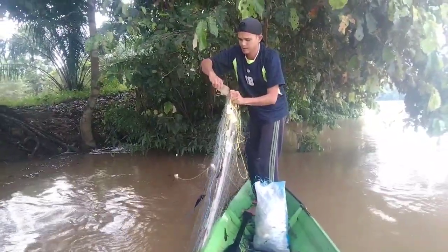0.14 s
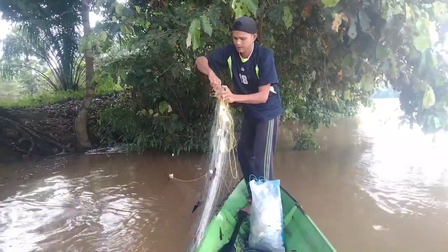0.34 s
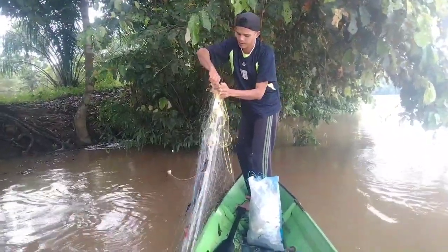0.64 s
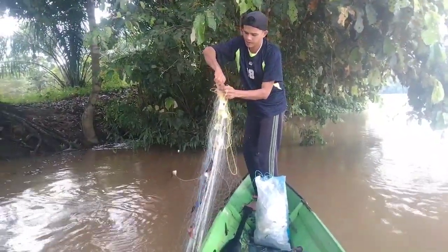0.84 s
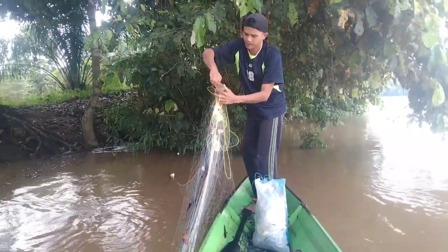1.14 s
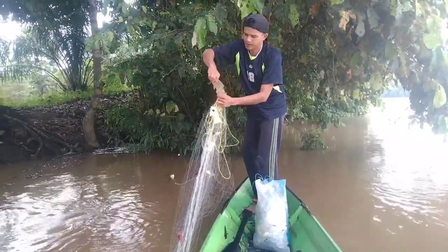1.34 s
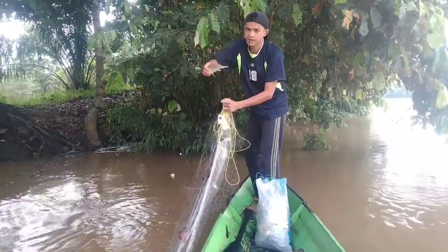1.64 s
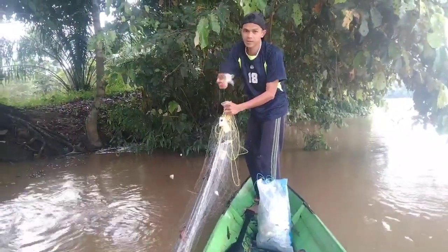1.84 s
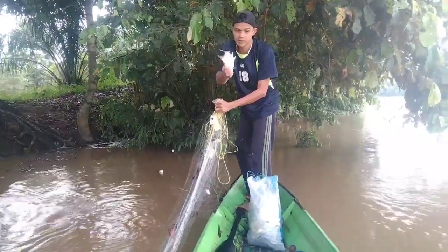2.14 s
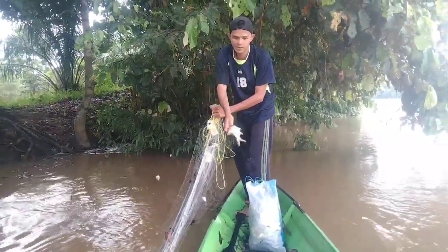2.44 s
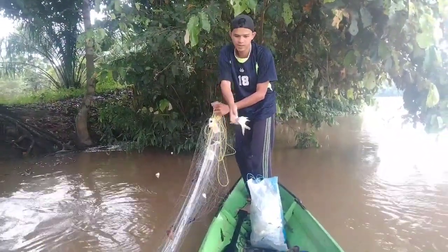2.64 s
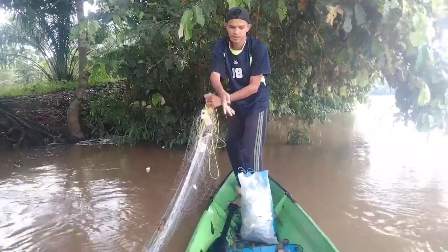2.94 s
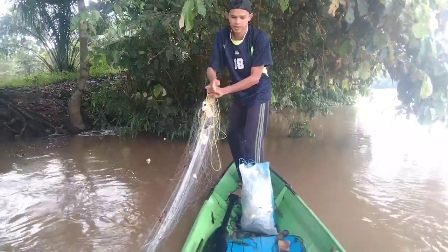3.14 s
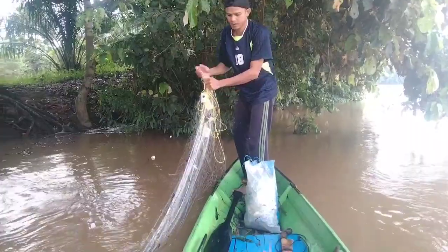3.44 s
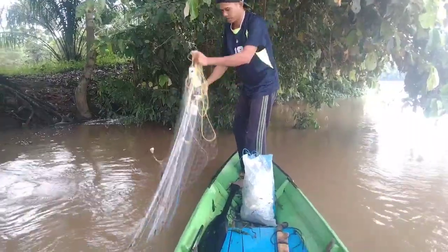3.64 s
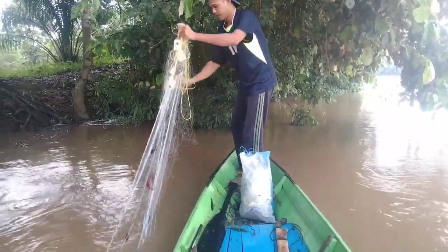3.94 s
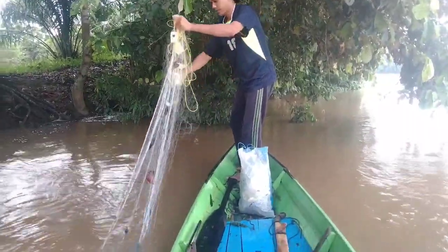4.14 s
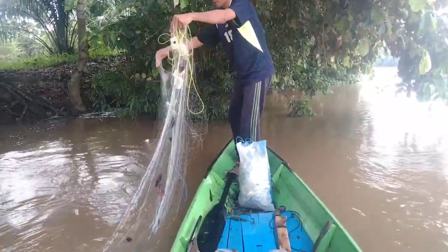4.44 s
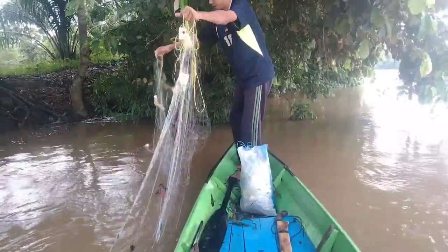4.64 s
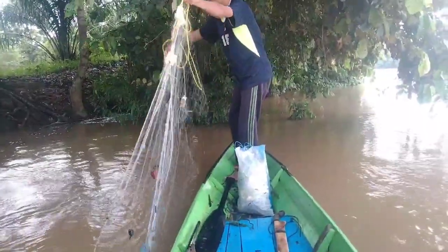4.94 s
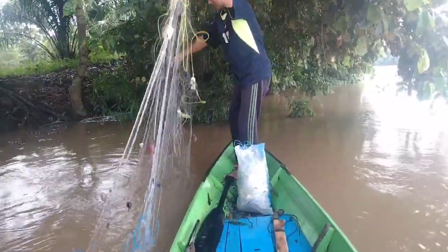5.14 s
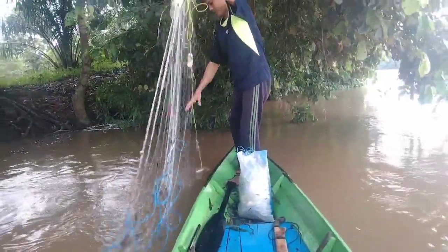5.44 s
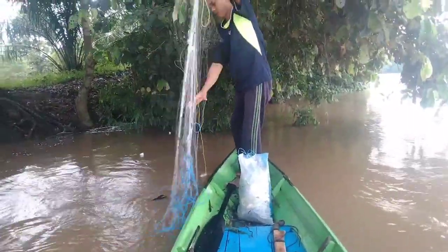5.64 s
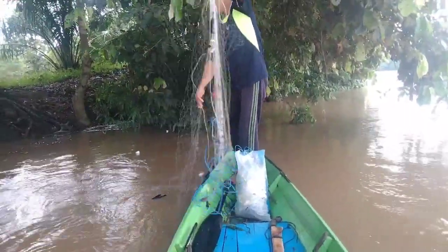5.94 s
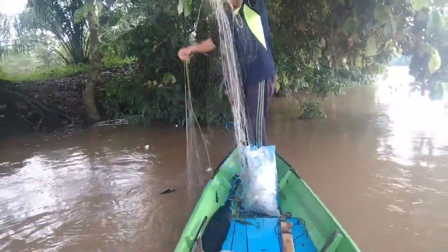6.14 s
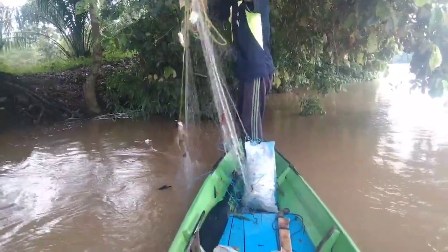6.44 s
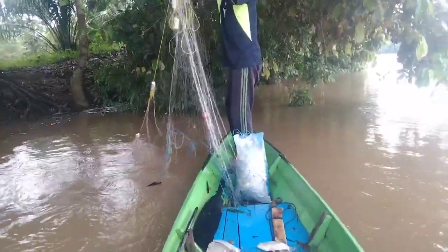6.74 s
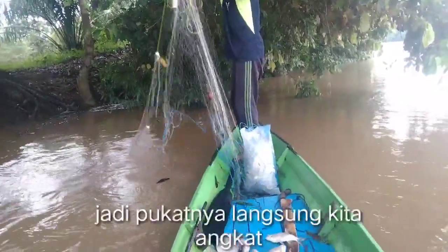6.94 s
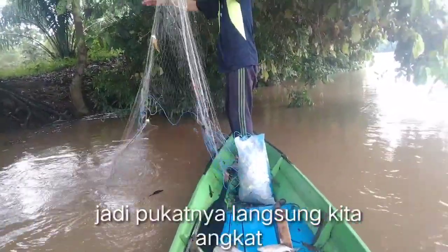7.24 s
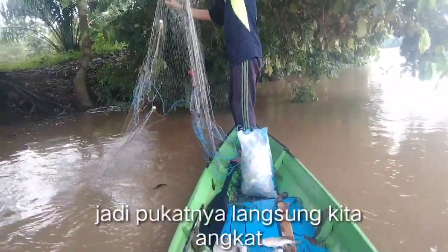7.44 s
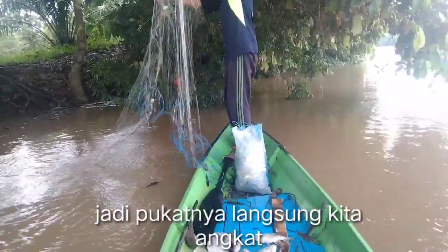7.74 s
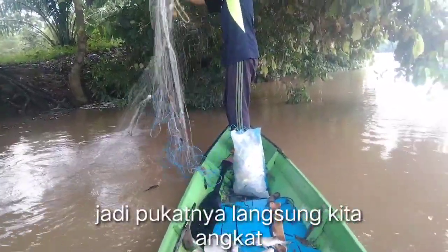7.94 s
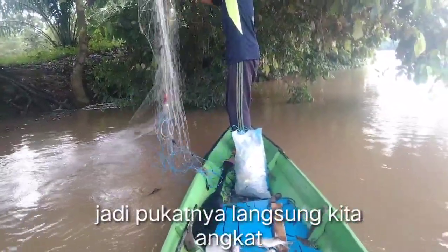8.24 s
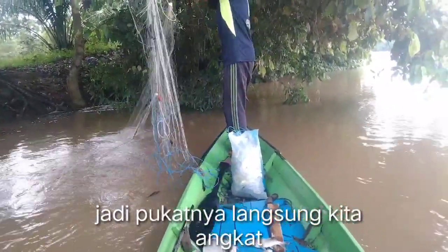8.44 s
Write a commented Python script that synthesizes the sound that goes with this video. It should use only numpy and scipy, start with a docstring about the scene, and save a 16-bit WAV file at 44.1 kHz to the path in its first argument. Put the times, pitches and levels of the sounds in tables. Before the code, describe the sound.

Quiet opening: deep steady engine hum, soft hull laps, a few hollow plinks and thin birdsong. Around the middle, several abrupt fish flops bang on wooden planks, nearly overloading the microphone. Afterwards, bubbly drips grow into short splashing gushes and fizzing spray from a lifted net, with hard little sinkers clacking on the hull more and more often. Open river air, short diffuse echo, background ducked between sounds, engine dying away.

```python
"""A fish flops on the boards of a small wooden boat: each impact excites the damped modes of the hull.
A net is hauled in from a river: its sinkers tap the hull, and water runs and drips off the mesh as
populations of ringing bubbles. A far engine, a sum of harmonics of its firing cycle, throbs and fades.
Modulated tones and noise make birds and insects on the bank, over the shaped noise of the river and wind.
A noise suppressor then opens band by band around every sound."""
import sys
import numpy as np
from scipy import signal
from scipy.fft import rfft, irfft
from scipy.io import wavfile
from scipy.ndimage import uniform_filter1d

SR = 44100
rng = np.random.default_rng(int(sys.argv[2]) if len(sys.argv) > 2 else 0)


def file_out(sig):
    """Save sig as 16-bit WAV at sys.argv[1]."""
    # one column per channel
    cols = np.atleast_2d(sig).T
    # limit, then scale
    lim = np.clip(cols, -1, 1)
    pcm = np.round(lim * 32767).astype(np.int16)
    wavfile.write(sys.argv[1], SR, pcm)


N = 378819
T = np.arange(N) / SR


def gain_of(db):
    """Amplitude ratio of a level: 20 dB for each factor of ten."""
    return 10 ** (np.asarray(db) / 20)


def evened(x):
    """Normalisation to rms 1."""
    return x / np.sqrt(np.mean(x ** 2) + 1e-20)


def read(points, hz):
    """Interpolation of a spectrum along a logarithmic frequency axis."""
    f, value = np.transpose(points)
    return np.interp(np.log(hz + 1), np.log(f + 1), value)


def columns(rows, t):
    """Linear interpolation in time of every column after the first."""
    s, *cols = np.transpose(rows)
    return [np.interp(t, s, c) for c in cols]


def add(mix, s, sound):
    """Superposition: a sound starting at s seconds is summed into the mix."""
    part = mix[round(s * SR):][:len(sound)]
    part += sound[:len(part)]


def coloured(x, points):
    """Spectral shaping: each frequency is weighted by a curve in dB; rms 1."""
    weight = gain_of(read(points, np.fft.rfftfreq(len(x), 1 / SR)))
    return evened(irfft(rfft(x) * weight, len(x)))


def band(x, lo_hz, hi_hz):
    """Band-pass filtering between two cutoffs."""
    sos = signal.butter(2, [lo_hz, min(hi_hz, SR / 2.1)], "band", fs=SR, output="sos")
    return signal.sosfilt(sos, x)


def wander(per_s):
    """Low-passed randomness: noise averaged twice over 1 / per_s seconds drifts slowly; rms 1."""
    steps = rng.standard_normal(2000)
    size = max(round(len(steps) * SR / N / per_s), 2)
    smooth = uniform_filter1d(uniform_filter1d(steps, size), size)
    return evened(np.interp(T, np.linspace(0, N / SR, len(steps)), smooth))


def ring(modes, t):
    """Modal decay: each mode (Hz, width Hz, dB) dies the faster the wider its resonance; peak 1."""
    out = sum(gain_of(db) * np.exp(-np.pi * w * t) * np.sin(2 * np.pi * f * t) for f, w, db in modes)
    return out / abs(out).max()


def burst(t, lo_hz, hi_hz, t60):
    """Exponential decay of band noise, by 60 dB in t60 seconds; peak about 1."""
    return evened(band(rng.standard_normal(len(t)), lo_hz, hi_hz)) * gain_of(-60 * t / t60) / 2


def struck(modes, t, blow_t60):
    """Convolution of an uneven contact force with the modes it drives; peak 1."""
    blow = burst(t[:400], 220, 6600, blow_t60)
    out = signal.oaconvolve(blow, ring(modes, t))[:len(t)]
    return out / abs(out).max()


def grains(lo_hz, hi_hz, cycles, spread_db, rise, count, size=N):
    """Granular superposition: decaying, gliding tones of random strength, pitch and moment; rms 1."""
    out, pitches = np.zeros(size), np.geomspace(lo_hz, hi_hz, 12)
    at, which = rng.integers(0, size, count), rng.integers(0, len(pitches), count)
    strength = gain_of(spread_db * np.minimum(rng.exponential(1, count), 5))
    for k, hz in enumerate(pitches):
        u = np.arange(round(3 * cycles * SR / hz)) * hz / SR  # cycles elapsed
        envelope = np.exp(-u / cycles) * (1 - np.exp(-8 * u / cycles))
        tone = np.sin(2 * np.pi * u * (1 + rise * u / cycles)) * envelope
        impulses = np.bincount(at, strength * (which == k), size)
        out += signal.oaconvolve(impulses, tone)[:size]
    return evened(out)


WIND_DB = -75.5


def wind():
    """Slow amplitude modulation of low-frequency noise: faint, lumpy air movement."""
    return gain_of(WIND_DB + 5.4 * wander(5)) * evened(band(rng.standard_normal(N), 30, 70))


# spectrum of the river's wash: f/Hz, relative level/dB
RIVER_SPECTRUM = [(180, -40.5), (300, 1), (710, -17), (1450, -14), (1740, -22), (2500, -20), (3110, -16.5),
                  (3490, -24.5), (4700, -22.5), (5550, -19.5), (8000, -25), (11300, -24), (12500, -23),
                  (15800, -29)]
RIVER_DB = -47  # rms before suppression
# how far the suppressor lowers noise: f/Hz, depth/dB
SUPPRESSION = [(200, 0), (400, 15.5), (800, 22), (5000, 19.5), (12000, 27)]


def river():
    """Stationary broadband noise: the steady wash, raised in shape by what the suppressor takes away."""
    spectrum = [(f, db + read(SUPPRESSION, f)) for f, db in RIVER_SPECTRUM]
    wash = coloured(rng.standard_normal(N), spectrum)
    return gain_of(RIVER_DB + .4 * wander(4)) * wash


# one thin cricket tone: t/s, f/Hz, level/dB
CRICKET = [(0, 12280, -65), (.4, 12280, -55), (2.5, 12270, -53.5), (3.2, 12230, -55), (5, 12170, -55),
           (8.59, 12120, -56)]
# throbbing insect buzzes: start t/s, length/s, level/dB
BUZZES = [(0.021, 0.071, -62.5), (0.535, .15, -63), (1.652, 0.16, -62.5), (2.608, .19, -62),
          (5.29, 0.1, -64.5)]
BUZZ_HZ, BUZZ_WIDTH_HZ = 8010, 970
# short treble hisses: start t/s, length/s, level/dB
HISSES = [(0.081, 0.011, -62), (0.348, 0.15, -60), (0.893, 0.013, -56), (1.122, 0.045, -54.5),
          (1.4, 0.057, -62), (4.666, 0.014, -55.5)]
HISS_HZ, HISS_WIDTH_HZ = 8900, 4500
THROB_PER_S = 52


def insects():
    """Modulation: a tone drifts in frequency, and puffs of band noise throb in amplitude."""
    hz, db = columns(CRICKET, T)
    phase = 2 * np.pi * np.cumsum(hz + 12 * wander(30)) / SR
    out = gain_of(db + 1.5 * wander(20)) * np.sin(phase)
    calls = [(*row, BUZZ_HZ, BUZZ_WIDTH_HZ) for row in BUZZES]
    calls += [(*row, HISS_HZ, HISS_WIDTH_HZ) for row in HISSES]
    for s, length, db, hz, width in calls:
        n = round(length * SR)
        throb = 1 + 2.8 * np.sin(2 * np.pi * THROB_PER_S * T[:n])
        buzz = evened(band(rng.standard_normal(n), hz - width / 2, hz + width / 2))
        add(out, s, gain_of(db) * buzz * throb * signal.windows.tukey(n, .4))
    return out


# whistled bird notes: start t/s, length/s, f/Hz, level/dB
WHISTLES = [(.09, 0.065, 1503, -47.5), (.31, 0.11, 1524, -49), (.52, 0.071, 1010, -50),
            (.56, 0.089, 1470, -50.5), (.97, 0.15, 3300, -59), (1.15, 0.074, 5430, -57.5),
            (1.42, .12, 3470, -57.5), (1.62, 0.12, 5490, -57.5), (2.15, 0.12, 5270, -58.5),
            (2.53, 0.27, 4200, -58.5), (2.85, 0.39, 4015, -58), (2.98, 0.19, 3480, -55.5),
            (3.05, .2, 4400, -60), (4.246, .25, 4520, -62.5), (4.391, 0.26, 4080, -61),
            (4.85, 0.13, 4400, -58), (8.49, .09, 1420, -51)]
# overlapping peeps of far birds: t/s, level/dB
CHATTER = [(0, -79.5), (1, -60.5), (2.4, -62.5), (2.8, -56.5), (3.2, -67), (4.2, -62.5), (5.3, -63),
           (8.59, -69.5)]


def birds():
    """Frequency modulation: whistled tones waver slightly, over a crowd of short peeps."""
    out = gain_of(columns(CHATTER, T)[0]) * grains(3200, 5600, 70, 1.8, -0.0034, count=900)
    waver = wander(60)
    for s, length, hz, db in WHISTLES:
        n = round(length * SR)
        pitch = hz * (1 + .004 * waver[round(s * SR):][:n])
        note = np.sin(2 * np.pi * np.cumsum(pitch) / SR)
        add(out, s, gain_of(db) * note * signal.windows.tukey(n, .3))
    return out


# course of the far engine: t/s, level/dB
ENGINE_LEVEL = [(0, -36.5), (.4, -38), (1.2, -36.5), (1.5, -41.5), (3, -40), (4, -38.5), (4.3, -41),
                (6.2, -43.5), (6.75, -51.5), (7.1, -42), (7.5, -50.5), (8.59, -55.5)]
# harmonics: multiple of the firing cycle, early level/dB, level/dB once the boat has turned away
ENGINE_ORDERS = [(8, -23, -47.5), (10, -26, -19), (11, -11.5, -16), (12, -12, -7.5), (13, 2.5, -2),
                 (14, -12.5, -3.5), (15, -15, -19.5), (16, -25.5, -24), (18, -24, -12.5)]
# exhaust noise spectrum: f/Hz, relative level/dB
EXHAUST_SPECTRUM = [(30, -61), (58, -27), (102, -23.5), (145, -8.5), (161, -7), (249, -21.5), (343, -30.5),
                    (600, -65.5), (780, -86), (1320, -120)]
ENGINE_HZ, FIRST_FIRING_S = 12.5, .06  # firing cycles a second; phase origin


def engine():
    """Beating of harmonics: multiples of the firing cycle sum to a throb, over exhaust noise."""
    turn = 2 * np.pi * ENGINE_HZ * (T - FIRST_FIRING_S)
    away = np.interp(T, [2.5, 4.2], [0, 1])
    pipe_lag = 1.0  # radians; the pipe's resonance shifts the multiples below it
    tones = np.zeros(N)
    for k, early_db, late_db in ENGINE_ORDERS:
        level_db = early_db + away * (late_db - early_db) + 1.5 * wander(3)
        phase = k * turn - pipe_lag * (k < 13) + .15 * wander(3)
        tones += gain_of(level_db) * np.cos(phase)
    exhaust = coloured(rng.standard_normal(N), EXHAUST_SPECTRUM)
    return gain_of(columns(ENGINE_LEVEL, T)[0]) * (evened(tones) + gain_of(-6.0) * exhaust)


# ripples on the hull: t/s, level/dB, f/Hz
LAPS = [(0.163, -31, 330), (.291, -41.5, 392), (.38, -42.5, 430), (1.18, -45.5, 337), (1.491, -48.5, 420),
        (2.216, -33, 315), (2.284, -31, 353), (2.522, -44, 430), (2.681, -34, 404), (2.899, -38, 350),
        (3.079, -35, 344), (4.231, -39, 415), (4.49, -44, 413), (8.24, -39, 427.3)]


def laps():
    """Narrow-band resonance: each ripple on the hull is a dying puff of noise around one pitch."""
    out, t = np.zeros(N), np.arange(SR // 5) / SR
    for s, db, hz in LAPS:
        add(out, s, gain_of(db) * burst(t, 0.96 * hz, 1.04 * hz, 0.25) * (1 - np.exp(-t / 0.0068)))
    return out


# single drops: t/s, level/dB, starting bubble f/Hz
DRIPS = [(1.269, -43.5, 785), (1.271, -47.5, 560), (2.635, -48, 936), (2.659, -44, 1550),
         (3.002, -43.5, 1210), (3.01, -42, 2600), (4.584, -42.5, 1300), (4.665, -37, 1262),
         (4.761, -33.5, 1242), (4.943, -41.5, 2220), (4.966, -42.5, 1198), (4.991, -38.5, 695),
         (5.019, -43.5, 793), (5.149, -45.5, 2080), (5.258, -46.5, 810), (5.353, -39.5, 2330),
         (5.384, -49, 963), (5.427, -39, 2270), (5.759, -42, 1468), (5.822, -38.5, 2330),
         (6.068, -41.5, 955), (6.097, -40, 2100), (6.964, -39.5, 1566), (7.131, -38.5, 876)]
BUBBLE_CYCLES, BUBBLE_RISE_PER_S = 91, 1.5  # cycles to die by 60 dB; share of the starting pitch
# one bubble that sweeps up: start t/s, length/s, level/dB, from f/Hz, to f/Hz
GULP = [(7.445, .042, -40, 950, 1600)]
# small drops leaving the mesh: t/s, level/dB
TRICKLE = [(4.1, -68.5), (4.4, -61.5), (5.4, -61), (6.2, -60), (7.5, -60), (8.59, -60.5)]


def drips():
    """Bubble resonance: a drop traps a bubble whose pitch climbs as its oscillation dies."""
    out, t = np.zeros(N), np.arange(SR // 5) / SR
    for s, length, db, from_hz, to_hz in GULP:
        sweep = np.linspace(from_hz, to_hz, round(length * SR))
        gulp = np.sin(2 * np.pi * np.cumsum(sweep) / SR)
        add(out, s, gain_of(db) * gulp * signal.windows.tukey(len(sweep), .5))
    for s, db, hz in DRIPS:
        tone = np.sin(2 * np.pi * hz * (t + BUBBLE_RISE_PER_S * t ** 2 / 2))
        bubble = tone * gain_of(-60 * t * hz / BUBBLE_CYCLES)
        add(out, s, gain_of(db) * bubble * (1 - np.exp(-t / 0.001)))
    trickle = grains(900, 4500, 26, 2.5, 0.018, count=350)
    return out + gain_of(columns(TRICKLE, T)[0]) * (T > TRICKLE[0][0]) * trickle


# water running off the mesh in gushes:
# start t/s, held/s, splash level/dB, gurgle level/dB, swish level/dB, fizz level/dB
GUSHES = [(5.35, 0.16, -53.5, -55.5, -65.5, -52.5), (5.508, 0.021, -49, -60, -48, -44.5),
          (5.731, 0.049, -52, -56, -73.5, -84), (5.885, .05, -42.5, -58, -70, -49.5),
          (6.0, 0.13, -51.5, -67.5, -65.5, -52.5), (6.192, 0.43, -40, -43, -55.5, -47.5),
          (6.65, 0.029, -48.5, -52.5, -54, -49.5), (6.948, 0.25, -47.5, -50, -65.5, -51),
          (7.299, 0.054, -52.5, -81.5, -80.5, -51.5), (7.458, 0.058, -53, -63.5, -86, -56),
          (7.658, 0.035, -52, -81, -53.5, -49.5), (7.738, 0.15, -49.5, -70.5, -47.5, -51.5),
          (7.9, 0.11, -45.5, -56.5, -51, -47), (8.09, 0.069, -50, -86, -55, -48.5),
          (8.31, 0.051, -61, -74, -55, -66.5), (8.43, 0.085, -60, -79.5, -68.5, -66)]
GUSH_RISE_S, GUSH_FALL_DB_PER_S = 0.015, 113


def flow(t):
    """Addition of powers: gushes swell, hold and drain away; one row of gains for each layer."""
    start, held, *level_db = np.transpose(GUSHES)
    since = t[:, None] - start
    drain = gain_of(-GUSH_FALL_DB_PER_S * np.maximum(since - held, 0))
    shape = np.clip(since / GUSH_RISE_S, 0, 1) * drain
    return np.sqrt(gain_of(level_db) ** 2 @ shape.T ** 2)


# favoured bands of the splash: f/Hz, half-width/Hz, level/dB
SPLASH_BANDS = [(1490, 410, 0), (1760, 740, 10.5), (2140, 120, 13), (2500, 180, 7), (3480, 260, 7.5),
                (3980, 440, -0.5)]
GURGLE_LAG_S, FIZZ_LAG_S = 0.03, .02  # big bubbles and fine spray come a little after the splash


def pour():
    """Bubble populations: size sets pitch, from low gurgle through splash and airy swish to high fizz."""
    out = np.zeros(N)
    t = T[T > GUSHES[0][0]]
    n = len(t)
    noise = grains(889, 4700, 5.6, 0.6, 0.03, count=19000, size=n)
    noise += 0.9 * evened(band(rng.standard_normal(n), 2100, 5500))
    favoured = sum(gain_of(db) * band(noise, f - w, f + w) for f, w, db in SPLASH_BANDS)
    stray_plips = grains(900, 4414, 12, 1.33, 0.021, count=200, size=n)
    splash = evened(.5 * noise + favoured) + 0.41 * stray_plips
    gurgle = band(grains(380, 1000, 2.5, 2.0, 0.031, count=5000, size=n), 210, 1500)
    swish = grains(3700, 7800, 35, 0.91, 0.001, count=9000, size=n)
    spray = evened(band(band(rng.standard_normal(n), 7000, 18000), 7000, 18000))
    fizz = evened(grains(7200, 17000, 6, 1.2, .01, count=60000, size=n) + 1.2 * spray)
    water = np.zeros(n)
    lags = [0, GURGLE_LAG_S, 0, FIZZ_LAG_S]
    for k, (layer, lag) in enumerate(zip([splash, gurgle, swish, fizz], lags)):
        water += flow(t - lag)[k] * layer
    add(out, t[0], band(water, 250, 20000))
    return out


# a slow drip on something hollow: t/s, level/dB, loudest ring f/Hz
PLINKS = [(.847, -32.5, 1510), (1.327, -43, 1420), (1.72, -31, 2380), (2.123, -30.5, 2280),
          (2.833, -36, 3634)]
# modes of the hollow thing: f/Hz, width/Hz, level/dB
HOLLOW_MODES = [(750, 33, -8), (1430, 51, -3.5), (1836, 33, -2.5), (2080, 46, -6.5), (2600, 83, -6.5)]


def plinks():
    """Impulse response of a hollow body: each drip rings its damped modes."""
    out, t = np.zeros(N), np.arange(SR // 5) / SR
    for s, db, hz in PLINKS:
        add(out, s, gain_of(db) * ring(HOLLOW_MODES + [(hz, 45, 3)], t) * (1 - np.exp(-t / 0.00089)))
    return band(out, 680, 24000)


# sinkers and floats tap the hull: t/s, level/dB, f/Hz, treble tick level/dB
TAPS = [(4.2552, -29.5, 1580, -37.5), (4.5213, -32, 2200, -75.5), (4.6176, -30.5, 2610, -65),
        (5.4814, -29, 2450, -46.5), (5.4954, -20, 1480, -23.5), (5.6151, -27, 1897, -46.5),
        (5.7344, -30.5, 2360, -77), (5.874, -26.5, 1083, -48.5), (6.1828, -25.5, 2330, -35),
        (6.1953, -19, 2340, -46.5), (6.2716, -21.5, 1000, -68), (6.6514, -17, 2800, -30.5),
        (6.7554, -38.5, 2450, -29.5), (6.9262, -31, 1646, -57), (7.3088, -29.5, 1660, -38),
        (7.4421, -21.5, 1212, -44), (7.5946, -28.5, 2770, -50), (7.624, -28.5, 2400, -41),
        (7.673, -24.5, 2234, -39), (7.7476, -26.5, 1433, -45), (7.8679, 0, 1440, -32),
        (7.8885, -9.5, 1420, -66.5), (7.9362, -19.5, 1480, -49), (7.9807, -42, 1410, -38),
        (8.0775, -13.5, 1384, -34.5), (8.1174, -25.5, 2850, -39), (8.1579, -25, 1680, -50.5),
        (8.4173, -22.5, 1747, -33.5)]
TAP_KNOCK_DB = -27  # dull knock, relative to the tap
# upper modes of the planks: f/Hz, width/Hz, level/dB
HULL_HIGH = [(1420, 21, -34.5), (1420, 26, -1.5), (1790, 140, -1.5), (2065, 120, 4.5), (2450, 420, -6),
             (2850, 750, 12.5), (4200, 400, -14)]


def taps():
    """Coupled impact: a hard little weight sounds its own modes and the planks', with a treble tick."""
    out, t = np.zeros(N), np.arange(SR // 5) / SR
    for s, db, hz, tick_db in TAPS:
        weight_modes = [(hz, 70, 0), (.89 * hz, 60, -5), (1.4 * hz, 200, -6)]
        own = ring(weight_modes, t) * (1 - np.exp(-t / 0.0019))
        clack = 0.74 * own + 0.29 * struck(HULL_HIGH, t, 0.0013) + 0.65 * burst(t, 960, 3100, 0.03)
        clack += gain_of(TAP_KNOCK_DB) * burst(t, 1000, 2300, 0.089)
        tick = burst(t, 6300, 16000, 0.026)
        add(out, s, gain_of(db) * band(clack, 440, 4200) + gain_of(tick_db) * tick)
    return band(out, 680, 24000)


# the fish slaps the boards:
# t/s, slap level/dB, thud level/dB, knock level/dB, wet smack level/dB, loudest ring f/Hz
FLOPS = [(3.2095, -1.5, 4, 1.5, -8, 1396), (3.2257, -7.5, -34, -2.5, -4.5, 1330),
         (3.23, -15.5, -6, -6.5, -5.5, 3040), (3.401, -5.5, -15, -19, -19.5, 2006),
         (3.47, -28, -35.5, -33, -25, 1380), (3.6645, -14.5, -51.5, -39, -17, 3000),
         (3.696, -32, -46.5, -47, -30, 2044), (3.704, -2, -19.5, -9, -10, 2147),
         (3.7194, -23.5, -40, -19, -26.5, 2240), (3.9362, -16.5, -38, -28.5, -33.5, 1630),
         (3.9733, -11, -25, -23, -26.5, 1750), (4.0277, -28.5, -27, -32.5, -42.5, 2100)]
# planks booming: f/Hz, width/Hz, level/dB
HULL_LOW = [(203.5, 13, 0), (257.5, 19, -8), (280, 17, -7), (302, 20, -11)]
# planks knocking: f/Hz, width/Hz, level/dB
HULL_MID = [(358, 42, 2), (435, 22, -3.5), (512, 15, -8), (560, 59, -3), (597, 260, -2), (688, 81, -1.5),
            (800, 22, -9), (886, 29, -11)]
THUD_RISE_S = 0.0025


def fish():
    """Modal excitation by impact: boards boom, knock and clack under a short wet smack."""
    out, t = np.zeros(N), np.arange(SR // 4) / SR
    for s, slap_db, thud_db, knock_db, smack_db, hz in FLOPS:
        slap = 0.75 * struck(HULL_HIGH + [(hz, 150, 13)], t, 0.013)
        slap += 0.56 * burst(t, 980, 8000, 0.023) + 0.036 * burst(t, 790, 5000, 0.68)
        slap = band(slap, 700, 8400) * (1 - np.exp(-t / 0.00033))
        thud = ring(HULL_LOW, t) + .15 * burst(t, 35, 110, 0.1)
        thud *= 1 - np.exp(-t / THUD_RISE_S)
        knock = struck(HULL_MID, t, 0.0076) + 0.46 * burst(t, 340, 800, 0.076)
        smack = burst(t, 5500, 25000, 0.011) + .06 * burst(t, 5500, 19000, 0.081)
        add(out, s, gain_of(slap_db) * slap + gain_of(thud_db) * thud)
        add(out, s, gain_of(knock_db) * knock + gain_of(smack_db) * smack)
    return out


def scene():
    """Superposition of far and near sources, the near ones with a diffuse, decaying echo."""
    far = wind() + river() + insects() + birds() + engine()
    near = laps() + drips() + pour() + plinks() + taps() + fish()
    tail = rng.standard_normal(6000) * gain_of(-60 * T[:6000] / 0.24)  # scatter off hull, bank and leaves
    echo = signal.oaconvolve(near, np.r_[np.zeros(300), tail / np.linalg.norm(tail)])[:N]
    return (far + near + gain_of(-10.0) * echo)[None]


EDGE_HZ = 15900  # upper edge of the passband


def record(dry):
    """Spectral gating: a band opens on rising over its median and closes slowly; loud blows clip."""
    hz, t, z = signal.stft(dry[0], SR, nperseg=512, noverlap=384)
    power = uniform_filter1d(abs(z) ** 2, size=2, axis=0)
    power = uniform_filter1d(power, size=4, axis=1)
    power_db = 10 * np.log10(power + 1e-16)
    over_db = power_db - np.median(power_db, axis=1)[:, None]
    share = 1 / (1 + np.exp(-(over_db - 6.5) / 1.3))  # 0 shut, 1 open
    closing = t * 4.36  # shares a second
    share = np.maximum.accumulate(share + closing, axis=1) - closing
    gate = gain_of(read(SUPPRESSION, hz)[:, None] * (share - 1))
    clean = signal.istft(z * gate, SR, nperseg=512, noverlap=384)[1][:N]
    clipped = np.clip(clean, -.97, .97)
    low_pass = signal.firwin(511, EDGE_HZ, window=("kaiser", 9), fs=SR)
    return signal.oaconvolve(clipped, low_pass, "same")[None]


dry = scene()
out = record(dry)
file_out(out)
```